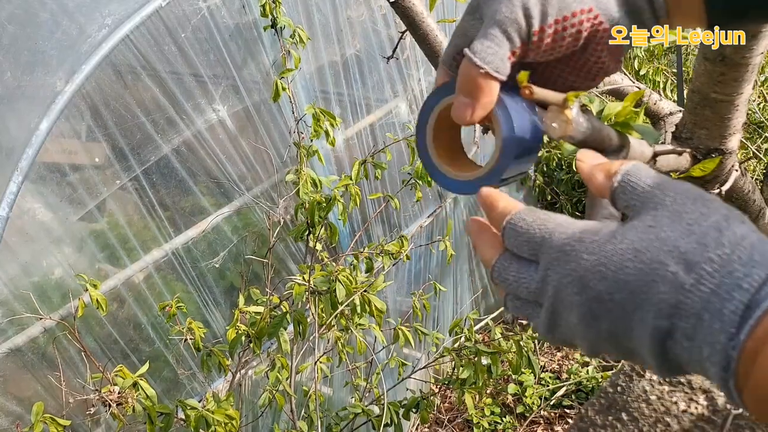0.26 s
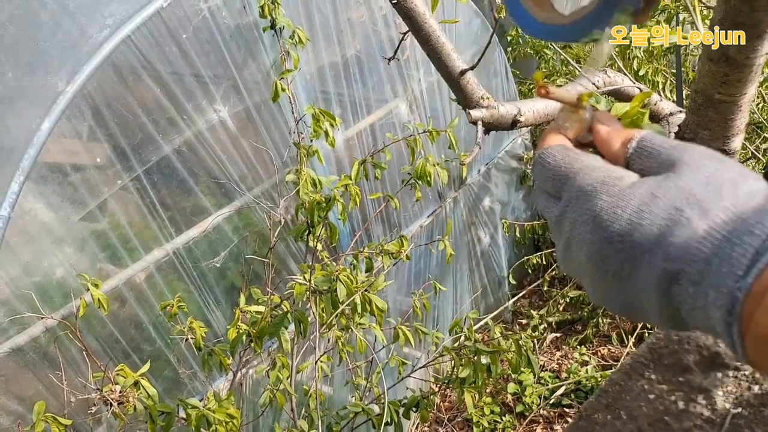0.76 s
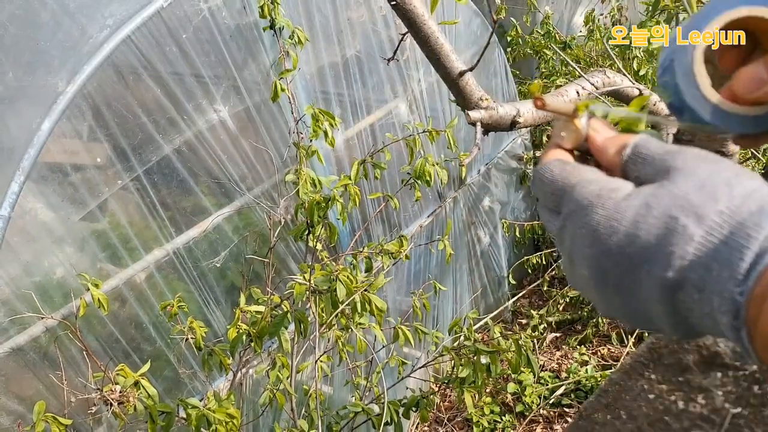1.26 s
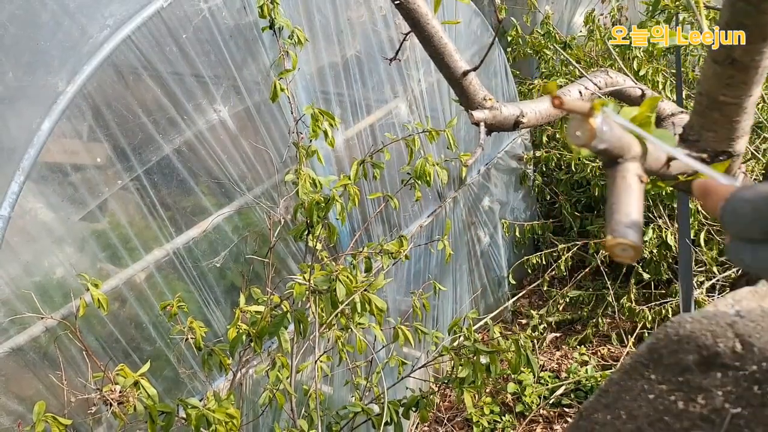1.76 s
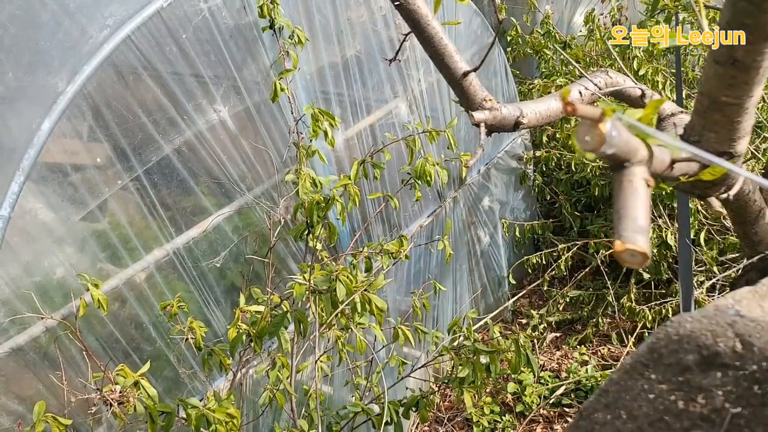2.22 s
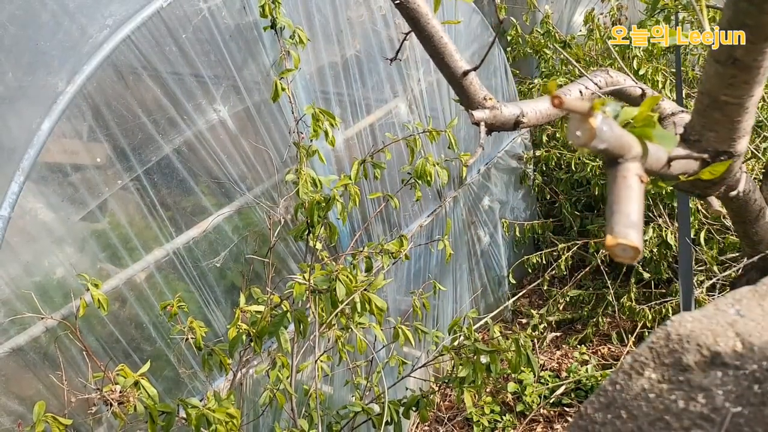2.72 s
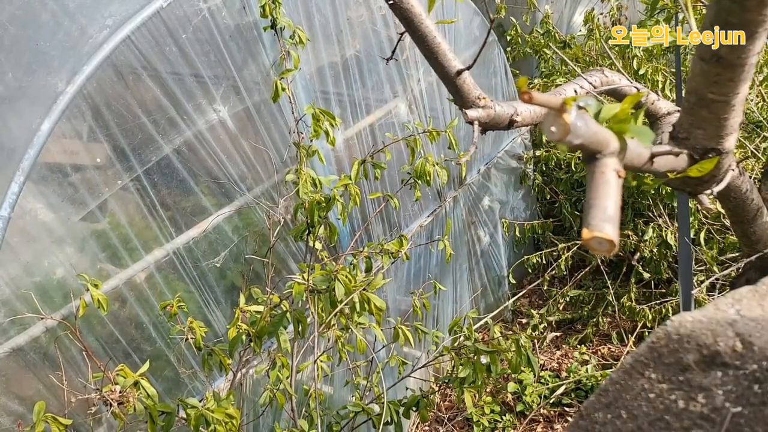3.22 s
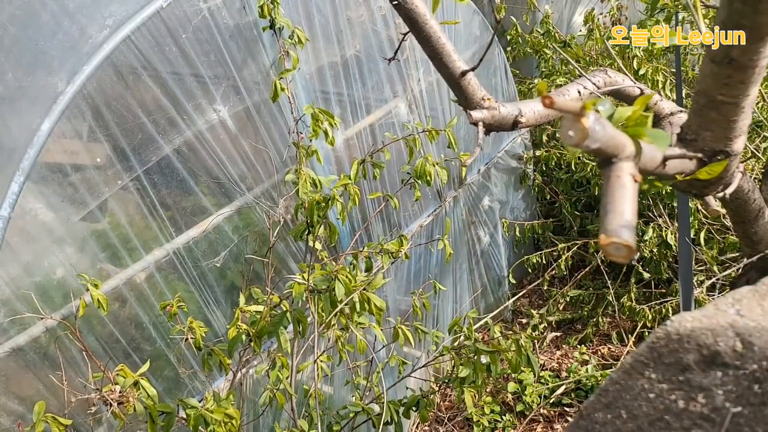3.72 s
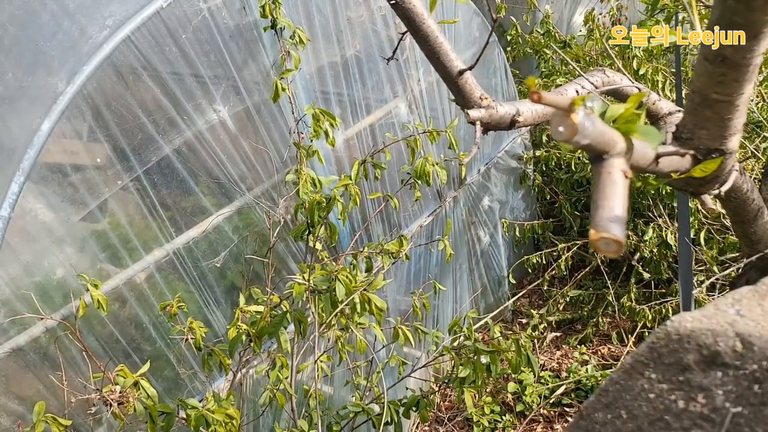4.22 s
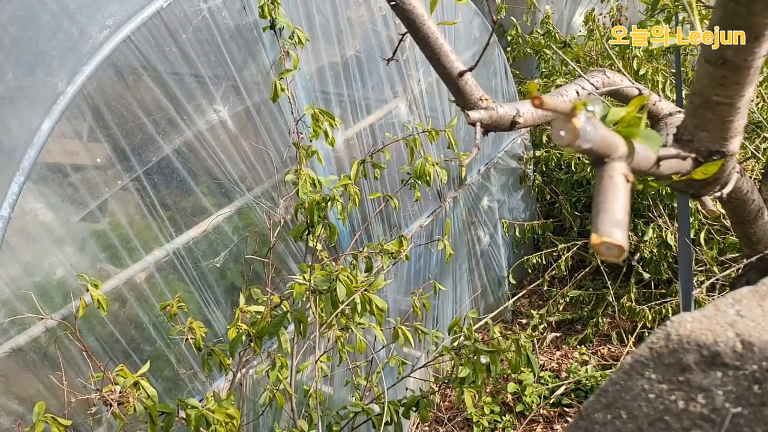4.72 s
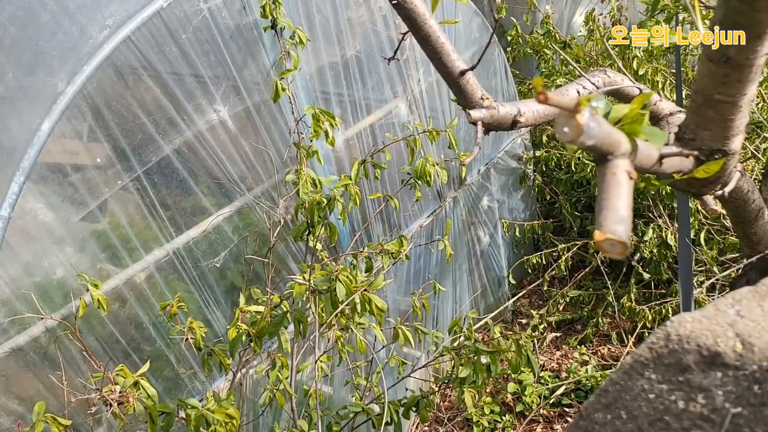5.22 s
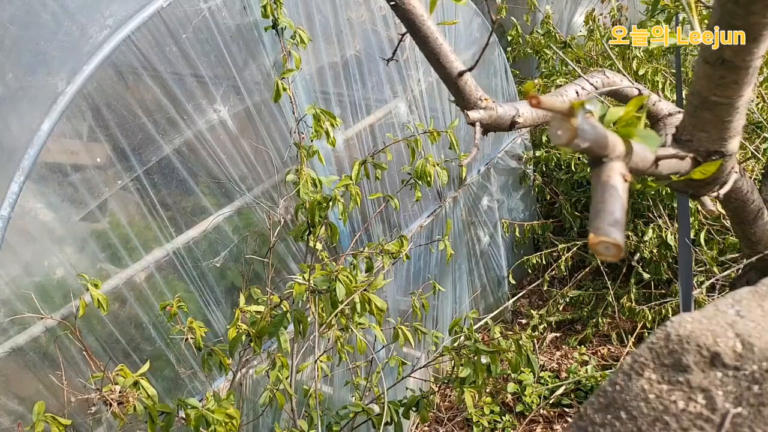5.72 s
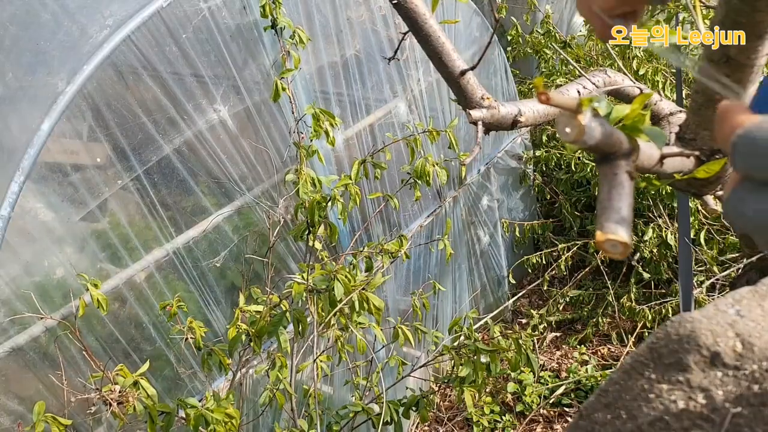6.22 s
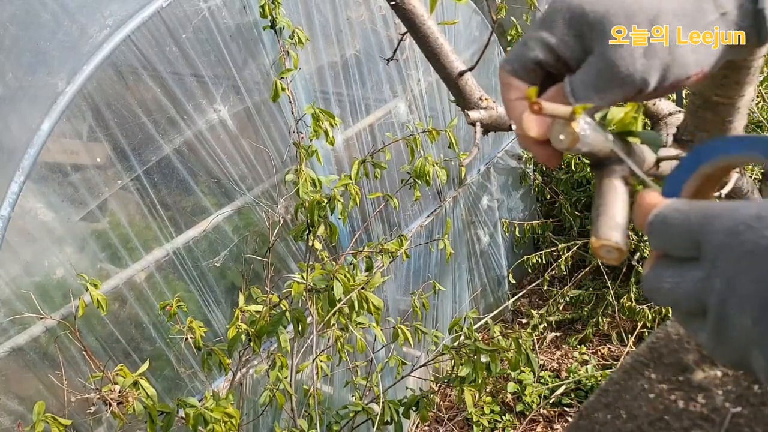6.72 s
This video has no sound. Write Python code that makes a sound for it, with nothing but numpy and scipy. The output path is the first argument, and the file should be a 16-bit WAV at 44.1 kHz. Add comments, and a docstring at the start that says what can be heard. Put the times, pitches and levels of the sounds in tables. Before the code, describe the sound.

Plastic tape is peeled and stretched around a branch in short crackling, twanging pulls, with faint bird chirps outdoors.

```python
"""In a garden, plastic grafting tape is pulled off its roll and stretched round a branch, close by.
The tape sticks and slips: each slip cracks and twangs the tight strip, whose pitch falls as it gets
longer. Steady pulls crackle; the tape also pops and squeaks, and the branch creaks under the load.
A bird calls some way off, leaves tick, an engine hums far away and light wind touches the microphone,
all over a soft, steady rush."""
import sys
import numpy as np
from scipy import signal
from scipy.fft import rfft, irfft
from scipy.io import wavfile
from scipy.ndimage import uniform_filter1d

SR = 44100
rng = np.random.default_rng(int(sys.argv[2]) if len(sys.argv) > 2 else 0)


def unload_audio(sound):
    """Save the sound as a 16-bit wav file, at the path given as the first command line argument."""
    columns = np.transpose(np.atleast_2d(sound))
    # keep every value between -1 and 1, then stretch to whole-number steps
    steps = np.round(np.clip(columns, -1, 1) * 32767)
    wavfile.write(sys.argv[1], SR, steps.astype(np.int16))


N = 307377
TIME = np.arange(N) / SR


def slips(travel_s=0.0015, slowing=1.15):
    """Tight tape sticks and slips with a crack and a twang. As the strip gets longer, its pitch falls."""
    # Each row: start in seconds, crack level in dB, twang level in dB.
    jerks = [(.6271, -25, -19.5), (.645, -21, -12), (0.7848, -17.5, -12), (.807, -20.5, -12),
             (.831, -21, -9.5), (.848, -25, -15), (1.3582, -22, -21), (1.384, -20.5, -24),
             (1.417, -22, -22), (1.6725, -25, -31.5), (1.7058, -21, -26.5), (1.7308, -24, -30.5),
             (1.7482, -36, -24.5), (1.765, -39, -32), (1.7767, -39, -23), (1.8054, -25.5, -20.5),
             (1.8462, -32.5, -19.5), (1.878, -24.5, -28), (1.894, -34.5, -41), (1.911, -31, -26),
             (1.927, -27, -22), (1.9506, -26, -25.5), (1.9751, -29, -5), (2.001, -32.5, -13.5),
             (2.615, -24.5, -30.5)]
    # Each row is a run of slips: start in seconds, first and last pitch in Hz, seconds for a twang to
    # fade by 60 dB, the crack's low and high edge in Hz, its fall above that in dB per octave.
    pulls = [(0.6, 904, 819, 0.042, 820, 900, 6), (0.76, 753, 720, 0.076, 702, 1260, 7),
             (1.33, 1165, 905, 0.049, 795, 3750, 10.5), (1.65, 563, 336, 0.055, 885, 2170, 14),
             (1.965, 1132, 1057, .012, 880, 2760, 9.5), (2.58, 1060, 1050, 0.068, 420, 6300, 4)]
    out = np.zeros((2, N))
    pull_of = np.searchsorted([pull[0] for pull in pulls], [jerk[0] for jerk in jerks]) - 1
    for index, (_, first_hz, last_hz, t60, low_hz, high_hz, fall) in enumerate(pulls):
        run = np.array(jerks)[pull_of == index]
        for start, crack_db, twang_db in run:
            still_to_pull = np.interp(start, run[[0, -1], 0], [1, 0])
            # the hand slows near the end of a pull, so the pitch drop eases off
            hz = last_hz * (first_hz / last_hz) ** (still_to_pull ** slowing)
            release = crack(crack_db, low_hz, high_hz, fall, decay_s=0.002, rise_s=0.004)
            hollow = reflect(release, hz, feedback=np.exp(-1 / (hz * travel_s)))
            add(out, start, hollow, pan_db=-4)
            add(out, start, undb(twang_db) * twang(hz, t60), pan_db=-7)
    return out


def twang(hz, t60, damping=0.58, rise_s=0.00093, lag_s=0.00013):
    """The plucked strip rings with several tones, much like a string; the high ones die first."""
    # Each row: multiple of the strip's pitch, level in dB.
    strip_tones = [(1.002, -4), (2.01, -8.5), (3.041, -2.5), (4.3, -11), (5.2, -15)]
    t = left_late(SR // 8, lag_s)
    sound = sum(undb(db) * fade_out(t, t60 / k ** damping) * np.sin(2 * np.pi * hz * k * t)
                for k, db in strip_tones)
    return sound * (1 - np.exp(-t / rise_s))


def crack(db, low_hz, high_hz, fall, decay_s, rise_s):
    """A patch of tape lets go and the film rattles for a few milliseconds."""
    t = np.arange(1024) / SR
    fade = np.exp(-t / decay_s) * (1 - np.exp(-t / rise_s))
    burst = rng.standard_normal((3, len(t))) * fade
    for _ in range(2):
        # so sudden a release stirs all frequencies alike
        spectrum = rfft(burst)
        burst = irfft(spectrum / np.abs(spectrum)) * np.sqrt(fade)
    rattle = film(ports(burst, apart=.7), low_hz, high_hz, fall)
    return at_level(rattle, db, span_s=.01)


def reflect(sound, hz, feedback):
    """A crack runs to and fro along the strip, once per cycle of its pitch, and so sounds hollow."""
    feedback = np.clip(feedback, 0, .8)
    loop = np.r_[1, np.zeros(int(SR / hz) - 1), -feedback]
    padded = np.pad(sound, ((0, 0), (0, 512)))
    return signal.lfilter([np.sqrt(1 - feedback ** 2)], loop, padded)


def film(x, low_hz, high_hz, fall):
    """The plastic film gives off one band of sound: cut steeply below, by `fall` dB per octave above."""
    size = 2048
    hz = np.fft.rfftfreq(size, 1 / SR) + 20
    db = -10 * np.log10(1 + (low_hz / hz) ** 6)
    db -= fall / 12 * 10 * np.log10(1 + (hz / high_hz) ** 4)
    # build the filter so that it rings only after a hit, never before
    cepstrum = irfft(np.log(undb(np.maximum(db, db.max() - 70))))
    cepstrum[1:size // 2] *= 2
    cepstrum[size // 2 + 1:] = 0
    response = irfft(np.exp(rfft(cepstrum)))
    return signal.fftconvolve(x, response[None], axes=1)


def cracks(spread=1.2):
    """Single dry ticks come from film too slack or too short to ring."""
    # Each row: start in seconds, level in dB, middle of the band in Hz.
    ticks = [(0.214, -45, 3230), (0.409, -48.5, 3480), (0.5519, -42.5, 1620), (2.1466, -44.5, 4000),
             (2.1567, -36.5, 4900), (2.1707, -30.5, 4400), (2.4553, -50.5, 4000), (2.5994, -38, 4400),
             (2.6213, -29, 6000), (2.7102, -60, 6000), (3.8802, -47, 4550), (3.975, -45.5, 3580),
             (4.887, -61, 6000), (5.357, -54.5, 4320), (5.372, -50.5, 5540), (5.5038, -26, 2300),
             (5.5058, -21, 2090), (5.576, -23, 2300), (5.6297, -22.5, 1940), (5.6433, -27.5, 1920),
             (5.6643, -23.5, 2420), (5.7829, -29, 3430), (5.877, -46, 3800), (5.9428, -28.5, 1500),
             (6.0309, -43.5, 2800), (6.0725, -50.5, 2450), (6.389, -55, 5470), (6.54, -62, 3040),
             (6.6552, -63.5, 6000), (6.7708, -64, 4490), (6.85, -59, 8600)]
    out = np.zeros((2, N))
    for start, db, hz in ticks:
        tick = crack(db, hz / spread, hz * spread, fall=16.5, decay_s=0.0034, rise_s=0.00032)
        add(out, start, tick, pan_db=-2.5)
    return out


def pops():
    """The stretched tape gives way in a few jerks, each a short, round ring."""
    # Each row: start in seconds, gain in dB.
    jerks = [(5.837, -29.5), (5.934, -24.5), (5.9355, -20), (5.9436, -8), (5.9463, -18.5)]
    # Each row: pitch in Hz, level in dB, seconds to fade by 60 dB.
    pop_tones = [(1500, -6, 0.024), (2120, 8, 0.0095), (2440, 8, 0.0086), (2960, -1.5, 0.012),
                 (5960, -25, 0.013)]
    out = np.zeros((2, N))
    for start, db in jerks:
        add(out, start, undb(db) * ring(pop_tones, lag_s=0.000395, rise_s=0.0005))
    return out


def peeling(bonds_per_s=1500, at_db=-30, db_per_doubling=17.5, grain_s=.0009, ease=0.24, spread=1.75):
    """A steady pull breaks many tiny sticky bonds of uneven strength, which merge into a crackle."""
    # Each row: start and end in seconds, level in dB, middle of the band in Hz,
    # fall above the band in dB per octave.
    peels = [(0.036, 0.103, -54.5, 8000, -24), (0.207, 0.272, -54.5, 2570, 10.5),
             (0.403, 0.519, -60.5, 2980, 10), (0.516, 0.576, -46.5, 2090, 4),
             (1.303, 1.404, -52.5, 9100, 38.5), (1.727, 1.791, -36, 1650, 11), (2.137, 2.181, -45, 3400, 8),
             (2.429, 2.466, -51, 4000, 31), (3.752, 3.858, -59.5, 5200, 16),
             (3.865, 3.901, -45.5, 4000, 0.5), (3.95, 4.014, -51.5, 2930, 9), (5.356, 5.515, -58, 3230, 13),
             (5.514, 5.598, -28.5, 2320, 18.5), (5.592, 5.698, -44, 2100, 14.5),
             (5.687, 5.766, -30.5, 2250, 15.5), (5.766, 5.798, -26.5, 2390, 14),
             (5.794, 5.852, -49.5, 2023, 9.5), (6.61, 6.696, -70, 5500, 29)]
    out = np.zeros((2, N))
    for start, end, db, hz, fall in peels:
        length = end - start
        size = max(int(length * (1 + ease) * SR), 200)
        strength_draw, break_draw = rng.random((2, SR // 4))[:, :size]
        strength = undb(3 * np.minimum(-np.log(strength_draw), 4))
        rate = bonds_per_s * 2 ** ((db - at_db) / db_per_doubling)  # harder pulls break bonds faster
        breaks = (break_draw < rate / SR) * strength ** 2
        energy = signal.lfilter([1], [1, -np.exp(-1 / (grain_s * SR))], breaks)
        grip = signal.windows.tukey(size, 2 * ease)  # the pull builds and slackens
        grains = np.sqrt(energy * grip) * rng.standard_normal((3, SR // 4))[:, :size]
        crackle = film(ports(grains, apart=1.0, count=15), hz / spread, hz * spread, fall)
        add(out, start - length * ease / 2, at_level(crackle, db, length), pan_db=-3.5)
    return out


def creaks(steps_per_s=170, scatter_db=4):
    """The wrap jerks along the wood in uneven steps that make the branch ring."""
    # Each row: start and end in seconds, level in dB.
    slides = [(1.42, 1.425, -31.5), (2.616, 2.623, -39.5), (5.504, 5.566, -38.5), (5.702, 5.818, -43.5),
              (5.865, 5.887, -36.5), (5.882, 5.934, -41), (6.356, 6.403, -50)]
    # Each row: pitch in Hz, level in dB, seconds to fade by 60 dB.
    branch_tones = [(181.6, -24, 0.056), (252, -3, 0.034), (364, -3, 0.024), (744, 3, 0.0215),
                    (1110, -7.5, 0.023), (1650, -1, 0.0096)]
    knock = ring(branch_tones, lag_s=0.00058, rise_s=0.00089)
    out = np.zeros((2, N))
    for start, end, db in slides:
        gaps, sizes = rng.standard_normal((2, 60))
        times = np.r_[0, np.cumsum(np.exp(.4 * gaps[1:]))] / steps_per_s
        inside = times < end - start
        steps = np.zeros(SR // 4)
        steps[(times[inside] * SR).astype(int)] = undb(scatter_db * sizes[inside])
        creak = signal.fftconvolve(steps[None], knock, axes=1)
        add(out, start, at_level(creak, db, end - start), pan_db=-9)
    return out


def squeaks(rough=0.081, flutter_db=4, overtone_db=-11):
    """Tape sliding on bark chatters at a rough, falling pitch."""
    # Each row: start and length in seconds, first and last pitch in Hz, level in dB.
    slides = [(0.213, 0.051, 2300, 1690, -53.5), (0.399, 0.036, 1920, 1890, -56.5),
              (0.467, 0.066, 1850, 1330, -57), (0.516, 0.061, 1238, 988, -48.5),
              (6.364, 0.028, 1173, 1068, -53.5)]
    out = np.zeros((2, N))
    for start, length, first_hz, last_hz, db in slides:
        size = int(length * SR)
        hz = np.linspace(first_hz, last_hz, size) * (1 + rough * wobble(1200, size))
        phase = 2 * np.pi * np.cumsum(hz) / SR
        tone = np.sin(phase) + undb(overtone_db) * np.sin(2 * phase)
        tone *= undb(flutter_db * wobble(350, size))
        add(out, start, undb(db) * unit(tone * signal.windows.tukey(size, .5)), pan_db=-3)
    return out


def bird(hoarse=0.087, flutter_db=3):
    """A bird gives hoarse, falling chirps, smeared by the trees in between."""
    # Each row: start and length in seconds, pitch near the top of the call in Hz, gain in dB.
    calls = [(0.099, 0.052, 2080, -54), (1.036, 0.11, 2244, -53), (2.319, 0.047, 1744, -57),
             (4.274, 0.1, 2302, -52.5), (5.04, .07, 2100, -57), (6.179, .11, 2386, -54),
             (6.846, 0.061, 1500, -61)]
    # Each row: share of the call's length, multiple of its pitch, gain in dB.
    call_shape = [(0, .95, -13), (.2, 1.03, -5), (.45, .96, 0), (.7, .8, -4), (1, .54, -8)]
    # Each row: multiple of the pitch, level in dB.
    voice_tones = [(1, -13.5), (2, 4), (3, -8), (4, -27.5)]
    out = np.zeros((2, N))
    share, pitch, effort_db = np.transpose(call_shape)
    for start, length, top_hz, db in calls:
        size = int(length * SR)
        progress = np.linspace(0, 1, size)
        hz = top_hz * np.interp(progress, share, pitch) * (1 + hoarse * wobble(900, size))
        phase = 2 * np.pi * np.cumsum(hz) / SR
        voice = sum(undb(tone_db) * np.sin(k * phase) for k, tone_db in voice_tones)
        effort = undb(np.interp(progress, share, effort_db) + flutter_db * wobble(320, size))
        effort *= signal.windows.tukey(size, .2)
        add(out, start, undb(db) * unit(voice * effort), pan_db=2)
    return undb(-4) * out + undb(-3) * echoes(out, t60=0.33)


def leaves(db=-70, scatter_db=4, count=30):
    """Leaves and gloves brush the branch now and then with faint, dry ticks."""
    out = np.zeros((2, N))
    for when, strength in rng.random((count, 2)):
        tick_db = db + scatter_db * (2 * strength - 1)
        tick = crack(tick_db, low_hz=4000, high_hz=8000, fall=10, decay_s=0.00067, rise_s=0.00026)
        add(out, when * (N / SR), tick)
    return out


def engine(waver=.04, throb=0.48):
    """Two wavering notes of a far engine beat together into a low hum."""
    # Each row: pitch in Hz, level in dB.
    notes = [(84, -62), (99, -63.5)]
    out = 0
    for hz, db in notes:
        phase = 2 * np.pi * np.cumsum(hz * (1 + waver * wobble(13, N))) / SR
        out = out + undb(db) * unit(np.sin(phase) * (1 + throb * wobble(13, N)))
    return out


def wind(band_hz=(34, 64), breeze_db=-67):
    """A light breeze and two gusts rumble on the microphone."""
    # Each row: time of the peak and half length in seconds, level in dB.
    gusts = [(2.98, 0.19, -55), (4.422, 0.16, -59)]
    band = signal.butter(2, band_hz, "band", fs=SR, output="sos")
    rumble = signal.sosfilt(band, rng.standard_normal((3, N)))
    strength = undb(breeze_db) + sum(undb(db) * bump(peak_s, half_s) for peak_s, half_s, db in gusts)
    return unit(ports(rumble, apart=.3)) * strength


def garden(db=-55, swell_db=2):
    """A soft, distant rush swells once. It is alike in both ears in the bass and wide higher up."""
    # Each row: frequency in Hz, relative level in dB.
    colour = [(15, -36), (25, -12), (102, -4.5), (293, -18.5), (451, -16.5), (545, -24), (695, -20.5),
              (911, -26), (1370, -28), (2990, -36.5), (6560, -48.5), (16000, -60)]
    # Each row: frequency in Hz, level in dB of the side (left minus right) against the shared middle.
    width = [(60, -13.5), (110, -16.5), (200, -9), (380, -0.5), (700, 4.5), (1290, 6.5), (2380, 0),
             (4400, 2), (8120, -0.5), (15000, -2)]
    hz = np.fft.rfftfreq(N, 1 / SR)
    mid, side = rfft(rng.standard_normal((2, N))) * undb(along(colour, hz))
    side *= undb(along(width, hz))
    rush = unit(irfft([mid + side, mid - side], N))
    out = np.zeros((2, N))
    add(out, 0, rush * undb(db + swell_db * bump(peak_s=3.2, half_s=1.0)), pan_db=-1)
    return out


def echoes(x, t60, dull_hz=6000):
    """Trees, ground and greenhouse scatter the sound into a soft tail."""
    t = np.arange(SR) / SR
    tail = rng.standard_normal((2, SR)) * fade_out(t, t60) * (1 - np.exp(-t / 0.002))
    tail = signal.sosfilt(signal.butter(1, dull_hz, fs=SR, output="sos"), tail)
    return signal.fftconvolve(x, tail / np.sqrt(np.sum(tail ** 2) / 2), axes=1)[:, :N]


def ring(tones, lag_s, rise_s):
    """Tones die away after one soft blow, reaching the left side lag_s later."""
    t = left_late(SR // 12, lag_s)
    sound = sum(undb(db) * fade_out(t, t60) * np.sin(2 * np.pi * hz * t) for hz, db, t60 in tones)
    return sound * (1 - np.exp(-(t / rise_s) ** 2))


def ports(noises, apart, count=9):
    """Both microphone openings hear one noise, the left `count` samples later, plus their own scatter."""
    shared, scatter = noises[0], noises[1:]
    late = np.pad(shared, (count, 0))[:len(shared)]
    return np.array([late, shared]) + apart * scatter


def left_late(size, lag_s):
    """Time in seconds for left and right; the left starts lag_s later."""
    return np.maximum(np.arange(size) / SR - np.array([[lag_s], [0]]), 0)


def fade_out(t, t60):
    """A fade that loses 60 dB every t60 seconds."""
    return np.exp(-np.log(1000) * t / t60)


def bump(peak_s, half_s):
    """A smooth rise to 1 and fall back."""
    return np.exp(-((TIME - peak_s) / half_s) ** 2)


def wobble(rate, size):
    """A smooth random wobble of about 1 either way, with `rate` new values a second."""
    hold = int(SR / rate)
    steps = rng.standard_normal(1000)[np.arange(size) // hold % 1000]
    return 1.3 * uniform_filter1d(uniform_filter1d(steps, hold), hold)[:size]


def along(points, hz):
    """Read between rows of (Hz, value), giving each octave equal room."""
    at, value = np.transpose(points)
    return np.interp(np.log(hz + 1), np.log(at), value)


def undb(db):
    """Turn decibels into a gain."""
    return 10 ** (np.asarray(db) / 20)


def unit(x):
    """Scale to an average level (rms) of 1."""
    return x / np.sqrt(np.mean(x ** 2) + 1e-20)


def at_level(sound, db, span_s):
    """Give each channel the energy of a steady sound at level db that lasts span_s."""
    power = np.sum(sound ** 2, axis=1, keepdims=True) / (span_s * SR)
    return sound * undb(db) / np.sqrt(power + 1e-20)


def add(out, start_s, sound, pan_db=0):
    """Mix a sound in at start_s; pan_db above 0 leans left, below 0 right."""
    start = max(int(start_s * SR), 0)
    sides = unit(undb(np.array([[pan_db], [-pan_db]]) / 2))
    out[:, start:start + sound.shape[-1]] += (sides * sound)[:, :N - start]


def scene():
    """The tape close by, its faint echoes, and the garden behind."""
    behind = garden() + engine() + wind() + leaves() + bird()
    tape = slips() + cracks() + pops() + peeling() + creaks() + squeaks()
    return tape + undb(-24.5) * echoes(tape, t60=.2) + behind


def record(dry, top_hz=16400):
    """The microphone openings colour the treble and the recorder cuts off the very top."""
    # Each row: frequency in Hz, gain in dB.
    port_colour = [(3200, 0), (4200, -1.5), (5300, -1.5), (5900, 3), (6800, 2.5), (7900, 4), (8600, -5),
                   (9800, -2), (11800, 3.5), (13200, 1.5), (15500, 0)]
    gain = undb(along(port_colour, np.fft.rfftfreq(N, 1 / SR)))
    coloured = irfft(rfft(dry) * gain, N)
    return signal.sosfilt(signal.ellip(8, .2, 70, top_hz, fs=SR, output="sos"), coloured)


dry = scene()
out = record(dry)
unload_audio(out)
```